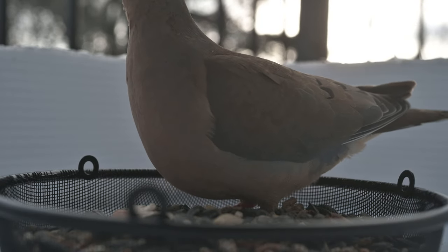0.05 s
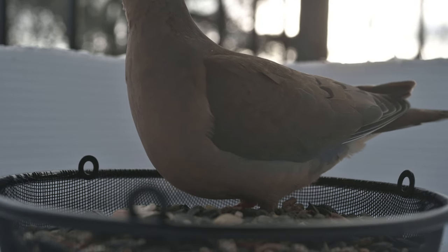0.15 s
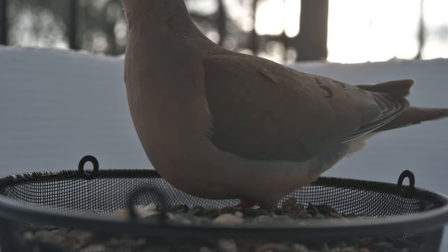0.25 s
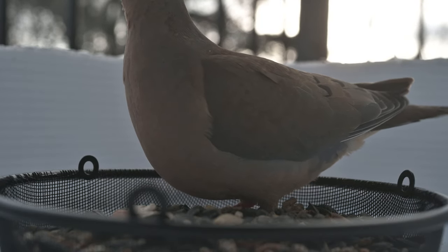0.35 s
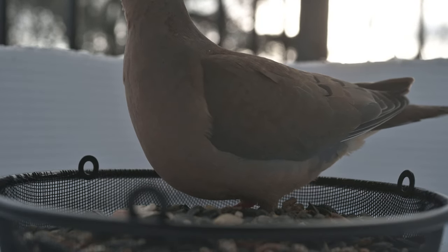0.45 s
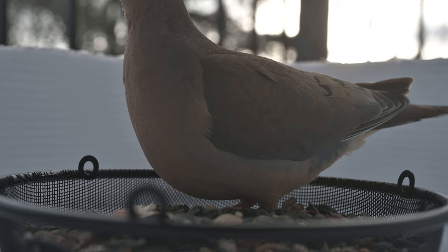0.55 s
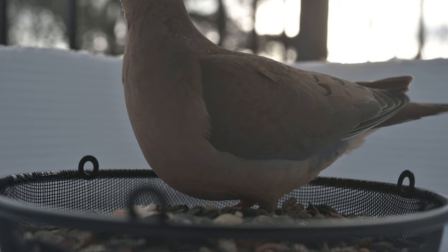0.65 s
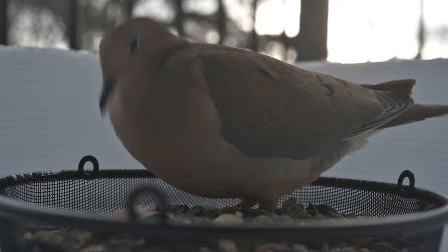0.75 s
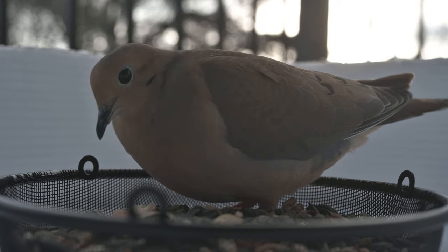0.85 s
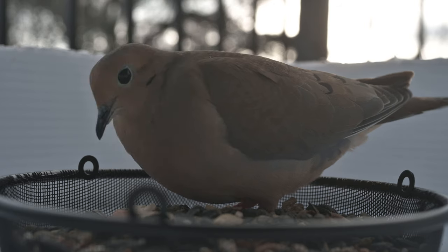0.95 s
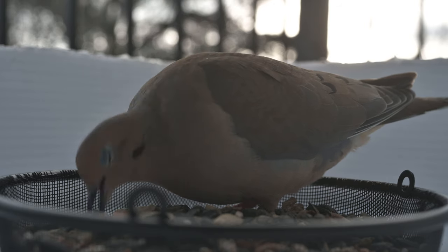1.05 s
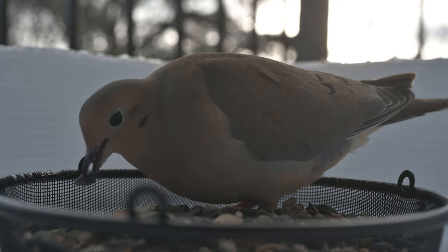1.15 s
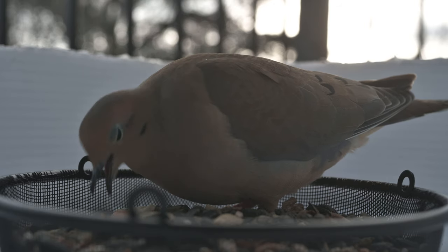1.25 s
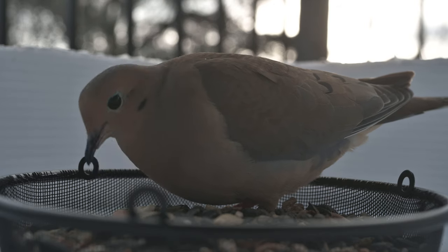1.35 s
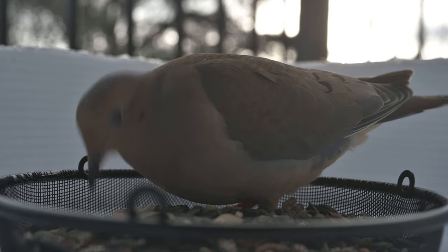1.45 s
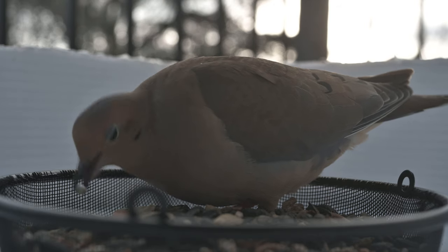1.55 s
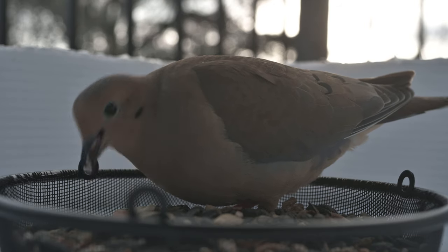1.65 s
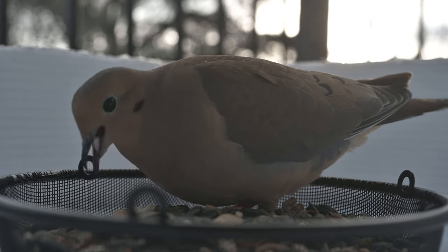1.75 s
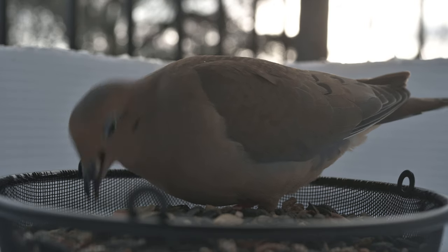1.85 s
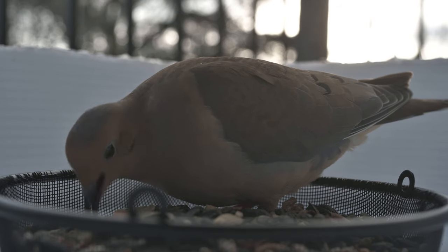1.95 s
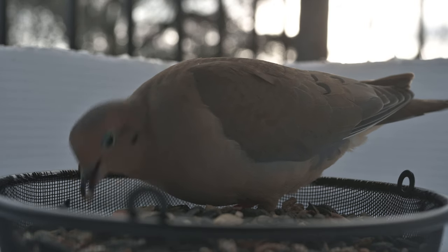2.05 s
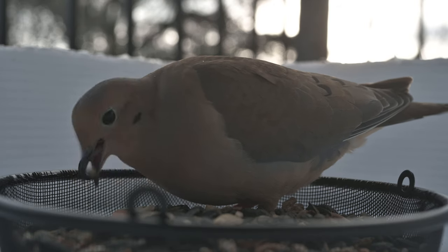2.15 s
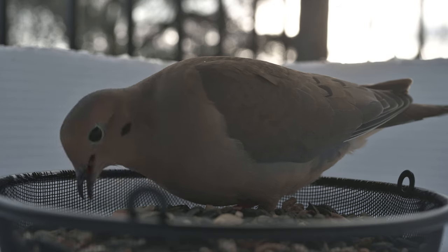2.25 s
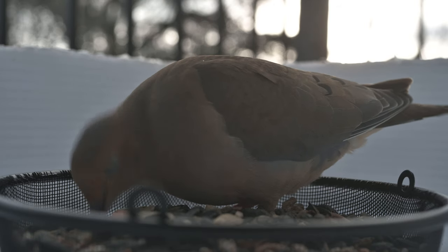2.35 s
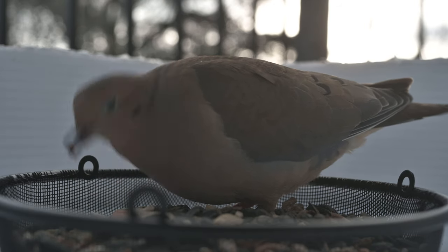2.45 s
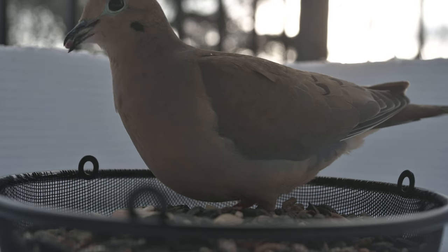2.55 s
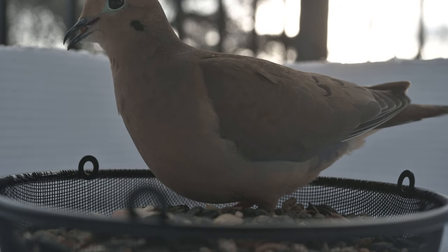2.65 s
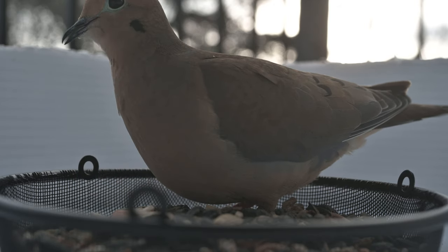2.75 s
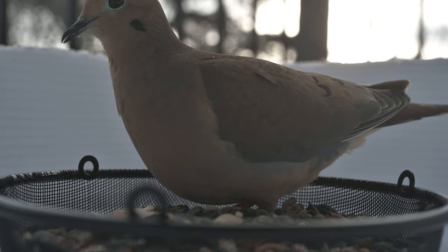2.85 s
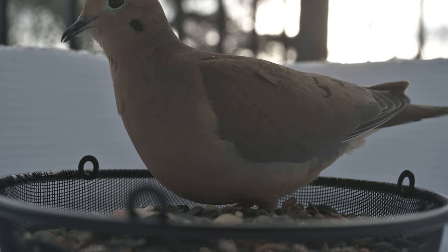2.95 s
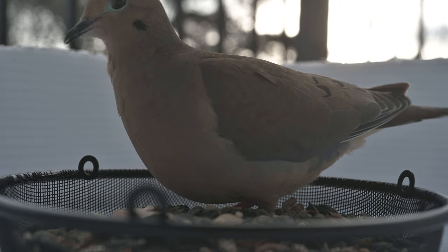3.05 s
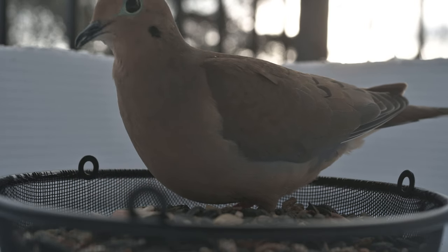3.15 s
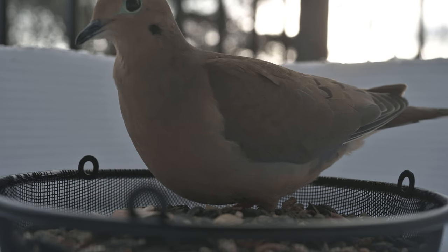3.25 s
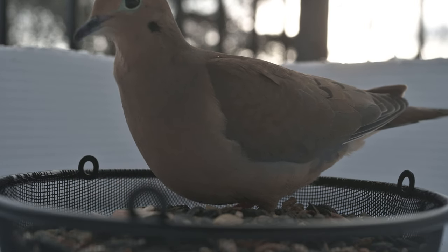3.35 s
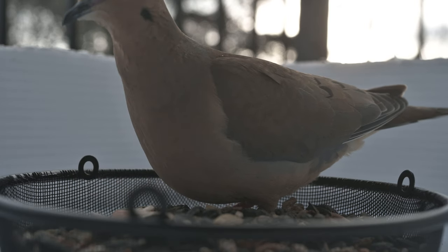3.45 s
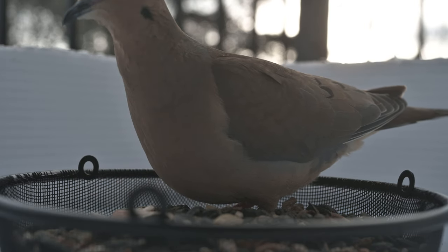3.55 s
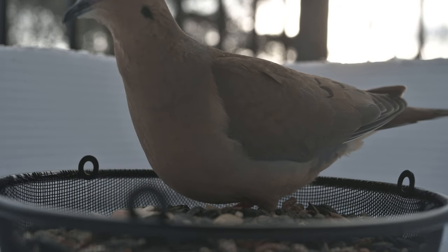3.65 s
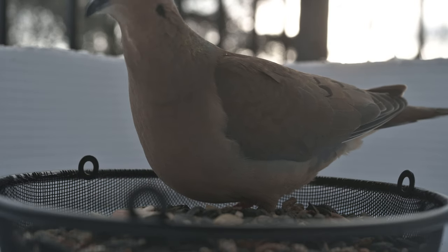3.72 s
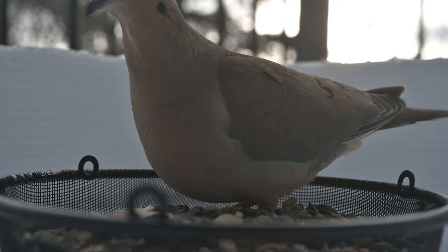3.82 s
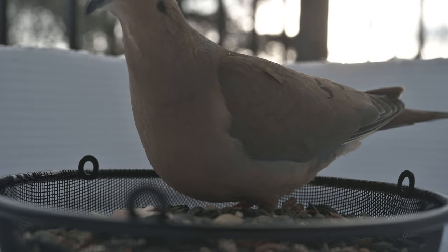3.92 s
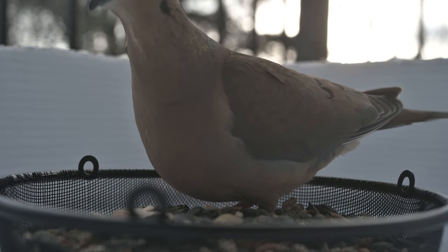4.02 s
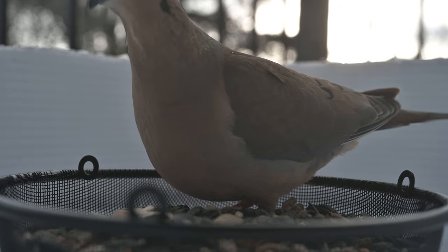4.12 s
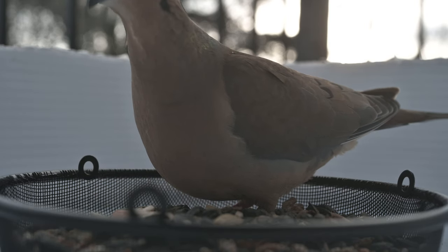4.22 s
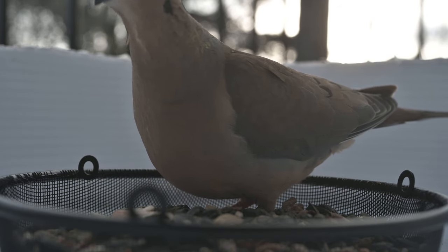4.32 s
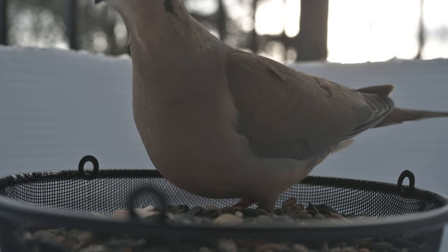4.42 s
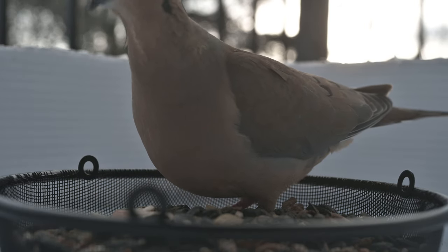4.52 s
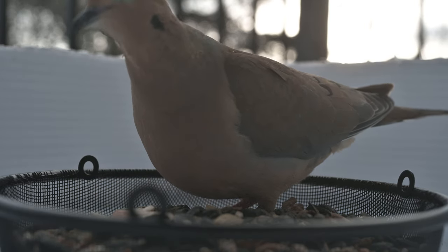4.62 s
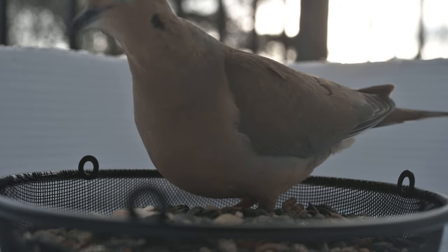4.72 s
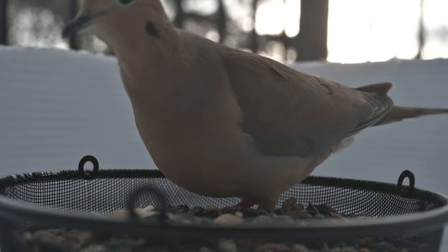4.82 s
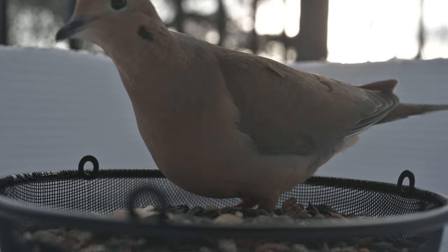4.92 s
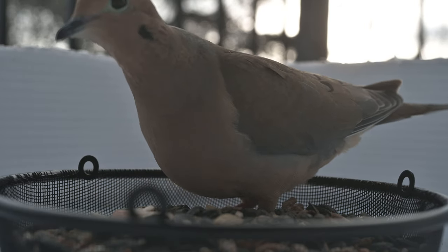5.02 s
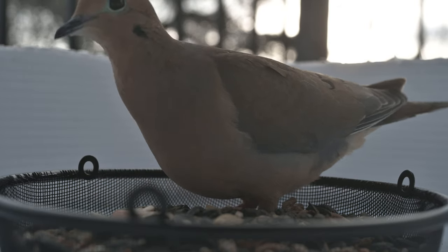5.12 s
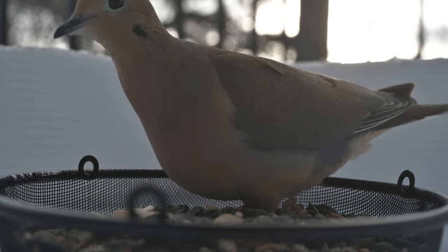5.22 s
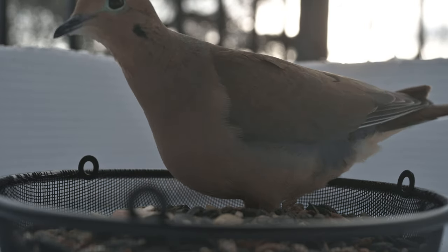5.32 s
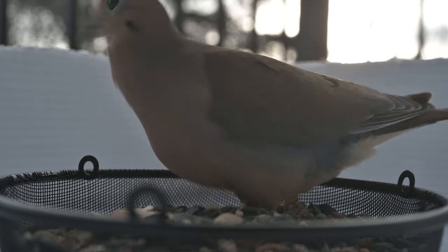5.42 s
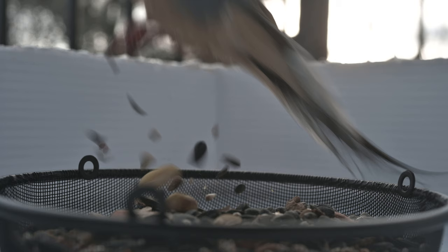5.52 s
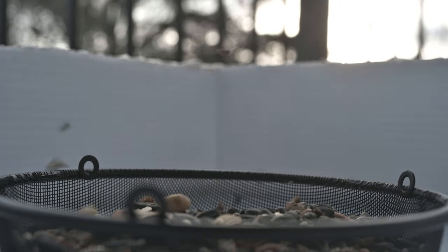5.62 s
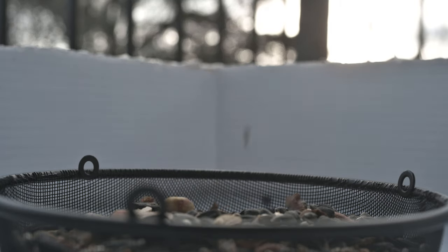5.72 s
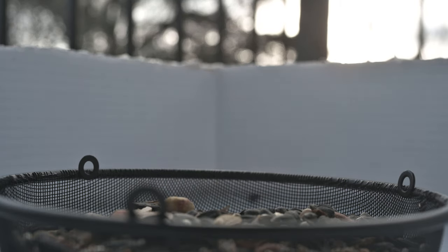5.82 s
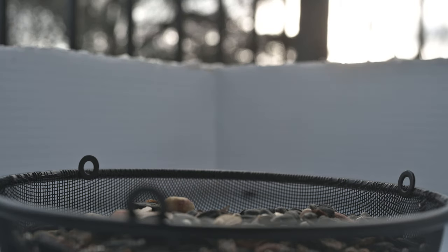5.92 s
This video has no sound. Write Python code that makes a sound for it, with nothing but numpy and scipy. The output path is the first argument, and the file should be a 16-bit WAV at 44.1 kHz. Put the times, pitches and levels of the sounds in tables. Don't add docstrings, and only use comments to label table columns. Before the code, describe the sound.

A quiet snowy yard with low road hum and a passing truck's drone. Songbirds whistle, buzz and trill from echoing woods while a dove's beak makes tiny crisp cracks close to the stereo microphone. At about 5.5 seconds it takes off: feather swishes, air thumps, one very sharp wing clap, and seeds rattling loudly onto a ringing mesh tray.

```python
import sys
import numpy as np
from scipy import signal
from scipy.io import wavfile
from scipy.ndimage import uniform_filter1d

SR = 44100
rng = np.random.default_rng(int(sys.argv[2]) if len(sys.argv) > 2 else 0)


def gain_from_db(level_db):
    decades = np.asarray(level_db, float) / 20
    return 10 ** decades


def wrap_up_sound(samples):
    columns = np.atleast_2d(samples).T
    tamed = np.clip(columns, -1, 1)
    steps = np.round(tamed * 32767).astype(np.int16)
    wavfile.write(sys.argv[1], SR, steps)


N = 263718

# (frequency [Hz], level per Hz [dB])
ROAD_SPECTRUM = [(12, -52), (20, -19.5), (60, -13.5), (74, -11), (96, -7.5), (168, -5.5), (270, -11),
                 (399, -19), (485, -14), (607, -20), (923, -15.5), (3740, -33.5), (5380, -39.5),
                 (9140, -45.5), (16000, -49)]
ROAD_DB = -39.5
# (frequency [Hz], width [Hz], level [dB])
ROAD_DRONES = [(451.3, 6.9, -66.5), (785, 200, -61), (1544, 340, -62)]
# (frequency [Hz], likeness [-1 to 1])
EAR_LIKENESS = [(60, 1.0), (150, 1), (380, 0.91), (950, 0.69), (2380, 0.23), (5980, -0.39), (15000, 0.15)]
# (frequency [Hz], left over right [dB])
ROAD_LEAN = [(60, -1.5), (180, 1), (550, 0.5), (1650, -2), (4970, -0.5), (15000, 0.5)]
# (pitch [Hz], waver [Hz], top level [dB], nearest time [s], fade [dB per s squared])
TRUCK_TONES = [(90.56, 8.95, -42.5, 0.2, 0.01), (132.9, 9.93, -47, 1.1, 0.3), (202.5, 9.7, -48.5, 2.62, 2)]

# (flick time [s], low whistle [Hz], whistles length [s], whistles level [dB], climb level [dB])
SONGS = [
    (1.447, 3000, 0.113, -51.5, -46),
    (1.866, 2770, 0.12, -49, -48),
    (2.231, 2830, 0.141, -47, -46.5),
]
# (from, to) [Hz]
CLIMB_HZ = (3600, 4000)
# (start, knee, high, top) [Hz]
FLICK_HZ = (5890, 7400, 8000, 8150)
# (lead [s], pitch [Hz], level over climb [dB])
PIPS = [
    (.046, 5300, -3.5),
    (.035, 4500, -2.5),
    (.009, 5200, -1.5),
]
# (start [s], level [dB])
CHURRS = [
    (0.067, -43),
    (3.592, -42.5),
]
# (sweeps [per s], depth [Hz], from [Hz], to [Hz], level [dB])
CHURR_BANDS = [(147.4, 570, 1650, 1500, -11), (156.3, 520, 2600, 3500, -1.5), (130, 2600, 3900, 2700, -5)]
# (start [s], length [s], pitch [Hz], sweep depth [Hz], level [dB])
CHACKS = [
    (3.715, 0.044, 3750, 1200, -37),
    (3.712, .05, 3600, 5600, -39.5),
    (3.72, 0.045, 2000, 490, -46.5),
    (8, .08, 4600, 5000, -47),
    (2.845, 0.061, 2380, 200, -48),
]
# (start [s], length [s], pitch [Hz], sweep depth [Hz], level [dB])
RASPS = [
    (0.0, 0.023, 3020, 340, -54.5),
    (.62, 0.13, 3340, 1087, -52),
    (.69, 0.074, 2800, 1680, -51),
    (.63, 0.093, 7250, 300, -68),
    (.75, 0.11, 2280, 174, -54),
    (1.735, 0.092, 5340, 877, -47.5),
    (1.745, 0.12, 5600, 250, -67),
    (2.36, 0.104, 3510, 250, -52),
]
# (start [s], length [s], top pitch [Hz], swings [per s], level [dB])
BUZZES = [
    (0.591, 0.23, 4900, 180, -50.5),
    (0.791, 0.12, 4690, 380, -44),
    (2.948, 0.18, 7970, 252, -51),
]
# (start [s], length [s], from [Hz], to [Hz], level [dB])
WHISTLES = [
    (0.775, .028, 7050, 6350, -58),
    (3.196, 0.057, 3840, 3876, -42),
    (3.205, 0.044, 3587, 3602, -38.5),
    (5.59, 0.013, 9250, 9300, -55),
]
# (time [s], pitch [Hz], level [dB])
LOUD_BUZZ = [
    (1.765, 3740, -52),
    (1.79, 4000, -40),
    (1.816, 4250, -42),
    (1.85, 4320, -37),
    (1.92, 4274, -45),
    (1.95, 4300, -45),
]
# (time [s], pitch [Hz], level [dB])
TRILL = [
    (2.34, 3870, -44),
    (2.37, 3880, -42),
    (2.42, 3980, -40),
    (2.5, 3960, -39.5),
    (2.56, 4100, -41),
    (2.65, 4130, -37.5),
    (2.76, 4080, -46.5),
]
# (time [s], pitch [Hz], level [dB])
HOOK = [
    (3.12, 6120, -46),
    (3.135, 6520, -34.5),
    (3.147, 6260, -44),
    (3.158, 5530, -46),
    (3.17, 4800, -58),
]

# (time [s], peak level [dB], center [Hz], left over right [dB])
CRACKS = [(0.334, -49, 6040, -7), (0.6524, -48, 7310, -1.5), (1.116, -40, 5250, 10),
          (1.1324, -22, 11000, 7), (1.204, -50, 8140, 15), (1.2932, -47, 6950, 5), (1.344, -38.5, 7660, 10),
          (1.427, -42, 6720, 2), (1.563, -44, 11500, 5), (1.5718, -29.5, 7900, 4), (1.6145, -51, 7800, 23),
          (1.645, -50, 8150, 13), (1.695, -46, 7600, 4.5), (2.064, -46, 7000, 4), (2.068, -38, 6500, 4),
          (2.072, -40, 7540, 8), (2.1111, -49, 10500, 16), (2.1556, -47, 7900, 21), (2.4274, -36, 6800, 8),
          (2.451, -40, 6650, 10), (2.756, -47, 6500, 10), (2.884, -47, 6500, 5), (2.889, -43, 6610, 3),
          (3.4341, -50, 6440, -13), (3.903, -56, 7460, -29), (3.916, -45.5, 7960, 10),
          (3.999, -41, 10500, -19), (4.013, -42.5, 9700, 10), (4.0694, -51, 9400, -13),
          (4.3694, -40.5, 6260, 4), (4.729, -49, 6640, -4), (4.9881, -45, 9060, -3)]
# (time [s], spread [s], swish level [dB], fizz over swish [dB])
STROKES = [(5.526, 0.016, -35, -6.5), (5.575, 0.018, -48.5, 11.5), (5.598, 0.005, -39, -5),
           (5.654, 0.0093, -41.5, 4), (5.625, 0.012, -54, 0), (5.68, 0.0046, -42, 6),
           (5.699, 0.0085, -28.5, -15), (5.725, .015, -56, 4), (5.81, 0.014, -56, 1.5),
           (5.759, 0.014, -32.5, -13), (5.87, 0.018, -73, 3), (5.95, 0.038, -40, -7)]
# (time [s], level [dB], pitch [Hz], length [s], left over right [dB])
GUSTS = [(5.526, -40, 199, 0.016, 3), (5.595, -33, 38.8, 0.028, 1), (5.62, -36, 124, 0.031, 0),
         (5.653, -31, 217, 0.0079, 5), (5.679, -23.5, 90, 0.0026, -0.5), (5.744, -26, 536, 0.0046, -5),
         (5.757, -22, 70, 0.0064, 0), (5.771, -47, 246, 0.017, 1), (5.868, -48, 109, 0.023, 19),
         (5.897, -32, 245, 0.0049, 27), (5.911, -27.5, 420, 0.0081, 29), (5.912, -28.5, 157, 0.018, 20),
         (5.917, -28.5, 350, 0.0031, 26), (5.953, -32, 231, 0.0059, 25), (5.964, -22, 130, 0.0044, 27),
         (5.966, -30.5, 383, 0.0073, 25), (5.98, -35, 200, 0.0066, 13)]
# (time [s], peak level [dB], center [Hz], rattle over body [dB], length [ms])
SEEDS = [(5.5096, -34, 6500, -10, 4.9), (5.533, -29, 6800, -10, 2.5), (5.5604, -26.5, 7340, -5, 2.7),
         (5.597, -25, 4300, -12, 2.1), (5.652, -28, 5000, -4, 2.9), (5.705, -21, 5500, 1.5, 2.5),
         (5.739, -17, 2610, -15, 2.9), (5.768, -12, 2620, -0.5, 3), (5.7859, -10.5, 3600, 2.5, 1.8),
         (5.7909, -18, 2800, -1, 2.5), (5.8116, -16, 7240, -9, 3.7), (5.8231, -25, 3200, -14, 1.8),
         (5.833, -17, 3990, -11, 2.2), (5.8455, -11, 4630, -12, 2.7), (5.858, -30, 2280, -15, 4),
         (5.8716, -15.5, 6500, 2, 3.4), (5.896, -32, 4000, -3, 2.5), (5.905, -29.5, 3020, -5, 2.5),
         (5.9124, -22, 6450, -6, 2.4), (5.9256, -36, 7000, 13, 2.2), (5.9304, -17, 3020, -7, 2.6),
         (5.934, -18, 5600, -13, 2.8), (5.942, -18, 4000, -4, 1.9), (5.9554, -24, 4680, -16, 2.9),
         (5.963, -16.5, 4600, -18, 3.8), (5.9672, -22, 4200, -3, 2.8)]
# (pitch [Hz], level [dB], time to fade by 60 dB [s])
TRAY_RINGS = [(1770, -39, 0.022), (2480, -8, 0.054), (3080, 4.5, 0.014), (4016, 1.5, 0.024),
              (4600, -6, 0.016), (5090, -4, 0.028), (5640, -35, 0.028), (6800, 9, 0.008)]
# (time [s], peak level [dB])
CLAP = [
    (5.69057, 3.0),
    (5.6915, -9),
    (5.6919, -7),
    (5.6928, -13),
    (5.6937, -13),
    (5.6945, -14),
]


def evened(x):
    return x / np.sqrt(np.mean(x ** 2) + 1e-20)


def peaked(x):
    return x / abs(x).max()


def read(points, hz):
    f, value = np.transpose(points)
    return np.interp(np.log(hz + 1), np.log(f + 1), value)


def add(mix, s, sound, pan_db):
    part = mix[:, round(s * SR):][:, :sound.shape[-1]]
    part += sound[..., :part.shape[1]] * gain_from_db(np.array([[pan_db / 2], [-pan_db / 2]]))


def apart(x, count):
    return np.array([x[0], np.roll(x[1], count)])


def resonate(x, hz, width):
    turn = np.exp(2j * np.pi * np.cumsum(hz * np.ones(len(x))) / SR)
    r = np.exp(-np.pi * abs(width) / SR)
    return 2 * (turn * signal.lfilter([1 - r], [1, -r], x / turn)).real


def resonate_twice(x, hz, width, second_width):
    return resonate(resonate(x, hz, width), hz, second_width)


def band(x, lo_hz, hi_hz):
    sos = signal.butter(2, [lo_hz, min(hi_hz, SR * .49)], "band", fs=SR, output="sos")
    return signal.sosfilt(sos, x)


def echoes(x, t60, start):
    t = np.arange(SR) / SR
    taps = rng.standard_normal((2, SR)) * (rng.random((2, SR)) < .06)
    taps = taps * gain_from_db(-60 * t / t60) * (t > start)
    return signal.fftconvolve(x, taps / np.linalg.norm(taps, axis=1, keepdims=True), axes=1)[:, :N]


def yard():
    frames, hz = N // 512 + 5, np.fft.rfftfreq(2048, 1 / SR)
    a, b, c, d, patches = rng.standard_normal((frames, 1025, 5)).T
    patches = uniform_filter1d(patches, size=20, axis=0)
    patches = evened(uniform_filter1d(patches, size=6, axis=1))
    same = np.clip(read(EAR_LIKENESS, hz), -.995, .995)[:, None]
    early = np.exp(2j * np.pi * hz * 0.61 / SR)[:, None]
    lean = gain_from_db(read(ROAD_LEAN, hz) / 2)[:, None]
    left = a + 1j * b
    right = same * left * early + np.sqrt(1 - same ** 2) * (c + 1j * d)
    z = np.array([left * lean, right / lean])
    color = gain_from_db(read(ROAD_SPECTRUM, hz)[:, None] + 1.38 * patches)
    wash = signal.istft(z * color, nperseg=2048, noverlap=1536)[1][:, :N]
    white = signal.istft(z, nperseg=2048, noverlap=1536)[1][:, :N]
    hiss = gain_from_db(-71) * rng.standard_normal((2, N))
    drone = np.zeros((2, N))
    for f, width, db in ROAD_DRONES:
        drone += gain_from_db(db) * evened(np.array([resonate_twice(x, f, width, 2 * width) for x in white]))
    return gain_from_db(ROAD_DB - 3.5) * evened(wash) + drone + truck(white) + hiss


def truck(white):
    t, out = np.arange(N) / SR, np.zeros((2, N))
    for hz, waver, db, nearest, fade in TRUCK_TONES:
        smooth = np.exp(-2 * np.pi * 5.47 / SR)
        drift = evened(signal.lfilter([1], [1, -smooth], rng.standard_normal(N)))
        tone = np.sin(2 * np.pi * np.cumsum(hz + .5 * waver * drift) / SR)
        halo = np.array([resonate_twice(x, hz, waver, 2 * waver) for x in white])
        level = gain_from_db(db - 1.0 - fade * (t - nearest) ** 2)
        out += level * (0.8 * evened(tone) + 0.31 * evened(halo))
    return out


def note(sweeps, depth_hz, fall, hoarse, rows):
    s, hz, db = np.transpose(rows)
    t = np.arange(s[0], s[-1], 1 / SR)
    noise, wobble = rng.standard_normal((2, SR // 2))[:, :len(t)]
    uneven = 1 + .06 * evened(uniform_filter1d(wobble, size=400))
    cycle = (np.cumsum(uneven) * sweeps / SR) % 1
    fall = max(fall, .05)
    if depth_hz > 0:
        slide = np.exp(-cycle / fall)
    else:
        slide = (np.cos(np.pi * cycle) ** 2) ** (.5 / fall)
    hz = np.interp(t, s, hz) + depth_hz * slide
    soft = np.clip(depth_hz / 3300, 0, .75) * np.maximum(slide ** 0.37, np.exp(-(1 - cycle) / 0.08))
    tone = np.sin(2 * np.pi * np.cumsum(hz) / SR)
    width = .5 * abs(depth_hz) * min(2 * fall, 1)
    breath = resonate_twice(noise, hz, width, width)
    hoarse = np.clip(hoarse, 0, 1)
    voice = np.sqrt(1 - hoarse) * evened(tone) + np.sqrt(hoarse) * evened(breath)
    edges = signal.windows.tukey(len(t), min((0.0011 + 0.012 * hoarse) * SR / len(t), 1))
    return gain_from_db(np.interp(t, s, db)) * evened(voice * (1 - soft)) * edges


def shaped(start, length, from_hz, to_hz, db, fade_db):
    rise = min(.03 / length, .4)
    return [(start, from_hz, db - 10), (start + rise * length, from_hz + rise * (to_hz - from_hz), db),
            (start + length, to_hz, db + fade_db)]


def song(s, low_hz, length, pair_db, climb_db):
    clear, notes, part = (29.0, 48, 0.38, 0.17, 3.2), [], np.linspace(0, 1, num=7)
    sag, flick_db = 0.023, -44.5
    for late, hz, drop, weak_db in ((0, low_hz, sag, 0), (0.114, 3160, -.4 * sag, -4.0)):
        when = s - .187 + length * (late + (1 - late) * part)
        flutter_db = np.sign(drop) * 5.5 * np.cos(3 * np.pi * part)
        db = pair_db + weak_db - flutter_db - 2.6 * (part == 0)
        notes.append((clear, np.transpose([when, hz * (1 + drop * (.5 - part)), db])))
    climb_s = 0.069
    climb = shaped(s - climb_s - .035, climb_s, *CLIMB_HZ, climb_db - 7.5, -1.5)
    notes.append(((75, 765, 0.29, 0.8, 1.1), climb))
    for lead, hz, over_db in PIPS:
        pip = shaped(s - lead, 0.0095, 0.85 * hz, 0.7 * hz, climb_db + over_db, -1.5)
        notes.append(((150, 250, 0.42, 0.16, 1.5), pip))
    tick_hz = 5760
    notes.append((clear, shaped(s - .03, 0.022, tick_hz * 0.91, tick_hz, climb_db - 4.0, 11.0)))
    low, knee, high, top = FLICK_HZ
    flick = [(s + 0.0017, low, flick_db + 11.0), (s + 0.00203 + 0.0051, knee, flick_db - 4.0),
             (s + 0.0144, high, flick_db - 5.0), (s + 0.015 + 0.0187, top, flick_db - 4.5)]
    return notes + [(clear, flick)]


def repertoire():
    notes = [((156, -750, 0.5, 0.76, -1.0), LOUD_BUZZ), ((12, 64, 0.8, 0.024, 1.5), HOOK)]
    for row in SONGS:
        notes += song(*row)
    for s, db in CHURRS:
        for rate, depth, hz, to_hz, band_db in CHURR_BANDS:
            notes.append(((rate, depth, .42, .95, .9), shaped(s, .08, hz, to_hz, db + band_db, -6.0)))
    for s, length, hz, depth, db in CHACKS:
        notes.append(((200, depth, .4, .9, 1.1), shaped(s, length, .97 * hz, 1.1 * hz, db, -28)))
    for s, length, hz, depth, db in RASPS:
        notes.append(((110, depth, .4, .8, 1.1), shaped(s, length, 1.02 * hz, .98 * hz, db, -1)))
    for s, length, hz, rate, db in BUZZES:
        notes.append(((rate, -1130, .24, .5, .4), shaped(s, length, 1.01 * hz, .98 * hz, db, -8)))
    for row in WHISTLES:
        notes.append(((27.4, 43, 0.51, .025, 2.0), shaped(*row, -6.0)))
    return notes


def songbirds():
    out, close = np.zeros((2, 2, N))
    for (*voice, pan_db), rows in repertoire():
        add(out, rows[0][0], note(*voice, rows), pan_db)
    add(close, TRILL[0][0], note(49.4, 2800, .13, .25, TRILL), 1.8)
    far = out + gain_from_db(-3.5) * close
    near, deep = echoes(far, t60=.24, start=.005), echoes(far, t60=.95, start=.03)
    return gain_from_db(1.5) * apart(out + close, count=-4) + gain_from_db(-1.2) * near + gain_from_db(-7.0) * deep


def burst(ms):
    t = np.arange(900) / SR * 1000 / max(ms, .3)
    snaps = rng.standard_normal(900) * gain_from_db(6.0 * np.minimum(rng.exponential(1, 900), 3))
    return snaps * np.where(t < .55, np.exp(-((t - .55) / .36) ** 2), np.exp(-(t - .55) / .5))


def beak():
    out = np.zeros((2, N))
    for s, db, hz, pan_db in CRACKS:
        x = burst(2.24)
        x = band(x, 0.61 * hz, 1.46 * hz) + 0.3 * band(x, 2900, 17400)
        add(out, s, gain_from_db(db) * peaked(x), pan_db)
    return apart(out, count=1) + gain_from_db(-3.0) * echoes(out, t60=0.063, start=0.0017)


def wings():
    t = np.arange(5.5 - .04, N / SR, 1 / SR)
    s, spread, db, fizz_db = np.transpose(STROKES)[..., None]
    rustle = gain_from_db(-51) * np.clip((t - t[0]) / 0.091, 0, 1)
    stroke = gain_from_db(db) * np.exp(-.5 * ((t - s) / spread) ** 2)
    swish_level = rustle + stroke.sum(0)
    fizz_level = rustle + (stroke * gain_from_db(fizz_db)).sum(0)
    shared, left, right, rough = rng.standard_normal((4, len(t)))
    grain = gain_from_db(2.0 * evened(uniform_filter1d(rough, size=60)))
    out = np.zeros((2, N))
    for own, side in ((left, 0), (right, 1)):
        swish = band((shared + 0.78 * own) * grain, 240, 2950)
        fizz = band((shared + 18.0 * own) * grain, 1670, 13000)
        fizz = gain_from_db(2.0 - 2.3 * side) * evened(fizz)
        out[side, -len(t):] = swish_level * evened(swish) + fizz_level * fizz
    return out


def gusts():
    out, t = np.zeros((2, N)), np.arange(-3000, 3000) / SR
    for s, db, hz, length, pan_db in GUSTS:
        unlike = [[1], [np.clip(hz / 300, .1, 1)]]
        rumble = np.cumsum(rng.standard_normal((2, 6000)) * unlike, axis=0)
        swirl = np.array([evened(resonate_twice(x, hz, .5 * hz, hz)) for x in rumble])
        push = 1.2 * np.cos(2 * np.pi * hz * t * (1 - 4.0 * t)) + .45 * swirl
        add(out, s + t[0], gain_from_db(db) * push * np.exp(-(t / length) ** 2), pan_db)
    return out


def tray(x):
    t = np.arange(1500) / SR
    ring = sum(gain_from_db(db - 60 * t / t60) * np.sin(2 * np.pi * hz * t) for hz, db, t60 in TRAY_RINGS)
    return np.convolve(x, ring)


def seeds():
    out = np.zeros((2, N))
    for s, db, hz, bright_db, ms in SEEDS:
        x, other = burst(ms), burst(ms)
        for side, lean in ((0, 0.61), (1, -0.19)):
            own = x + .8 * side * other
            ring = tray(own)[:900]
            body = band(own, 0.54 * hz, 1.83 * hz)
            fizz = band(own, 8300, 23500)
            hit = gain_from_db(lean * 4) * (peaked(body) + gain_from_db(-10.5) * peaked(ring))
            hit = hit + gain_from_db(bright_db + lean * 14.5) * peaked(fizz)
            part = out[side, round(s * SR) - 40 + 2 * side:][:900]
            part += gain_from_db(db + 4.5) * hit[:len(part)]
    ringing = band(echoes(out, t60=0.1, start=.002), 1500, 5000)
    return out + gain_from_db(-12.5) * ringing + gain_from_db(-19) * echoes(out, t60=0.06, start=.002)


def clap():
    out, t = np.zeros((2, N)), np.arange(1500) / SR * 1000
    suction = -np.exp(-((t - .13) / .052) ** 2)
    rebound = .65 * np.exp(-((t - .27) / np.where(t < .27, .06, .16)) ** 2)
    pulse = suction + rebound - .25 * np.exp(-((t - .6) / .07) ** 2)
    for s, db in CLAP:
        add(out, s, gain_from_db(db) * pulse, .9)
    add(out, CLAP[0][0], gain_from_db(-10) * peaked(tray(pulse)), .9)
    snap = band(burst(2.2), 3500, 20400)
    add(out, CLAP[0][0] - .0004, gain_from_db(-9) * peaked(snap), .9)
    return out + gain_from_db(-3.0) * echoes(out, t60=0.007, start=.002)


def scene():
    return yard() + songbirds() + beak() + wings() + gusts() + seeds() + apart(clap(), count=2)


def band_limit(x):
    return signal.sosfilt(signal.butter(12, 17140, fs=SR, output="sos"), x)


def record(dry):
    power_db = 10 * np.log10(abs(uniform_filter1d((dry ** 2).mean(0), size=900)) + 1e-12)
    fall = np.arange(N) * 3.4 / SR
    over_db = np.maximum(np.maximum.accumulate(power_db + fall) - fall + 30.5, 0)
    late_db = signal.lfilter([.002], [1, -.998], over_db)
    ducked = dry / gain_from_db(.5 * late_db)

    def lowpass(hz):
        taps = signal.firwin(801, hz, window=("kaiser", 9), fs=SR)
        return signal.oaconvolve(ducked, taps[None], "same", axes=1)

    cut = lowpass(15880)
    top = lowpass(16900) - cut
    strong = uniform_filter1d((top ** 2).mean(0), size=256) > gain_from_db(-122)
    gate = uniform_filter1d(1. * strong, size=200)
    return band_limit(cut + gain_from_db(-21) * gate * top)


dry = scene()
out = record(dry)
wrap_up_sound(out)
```